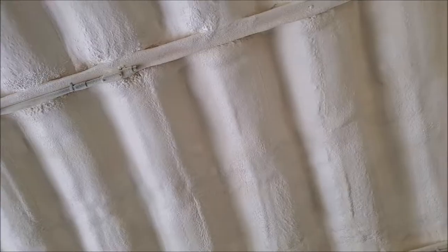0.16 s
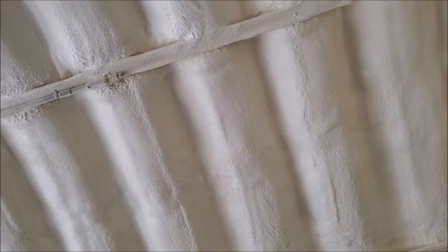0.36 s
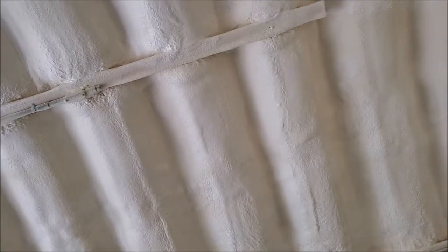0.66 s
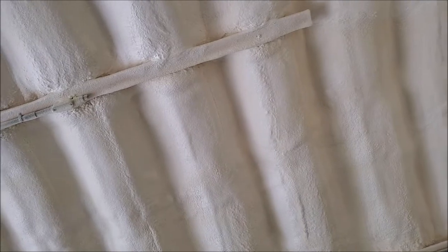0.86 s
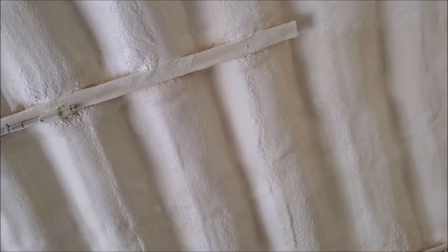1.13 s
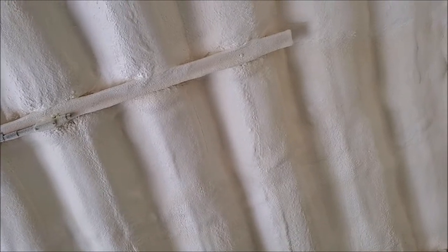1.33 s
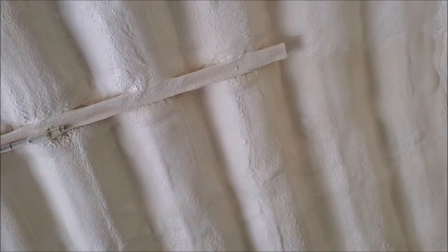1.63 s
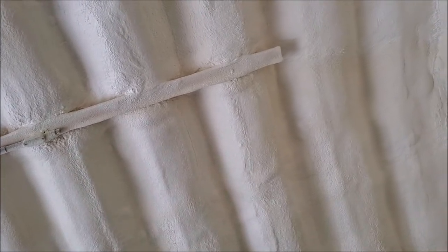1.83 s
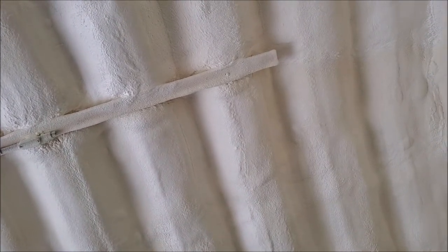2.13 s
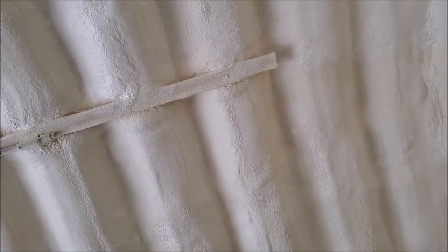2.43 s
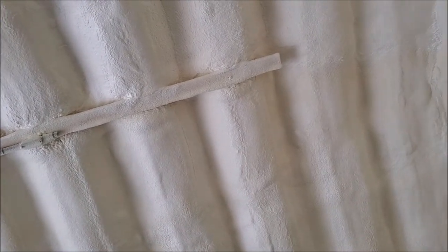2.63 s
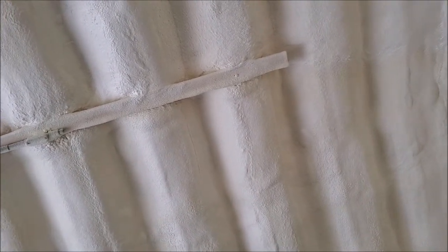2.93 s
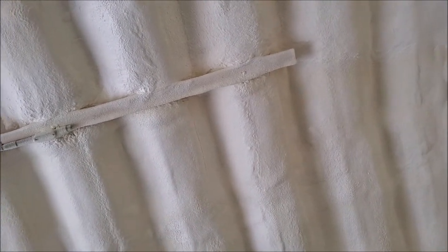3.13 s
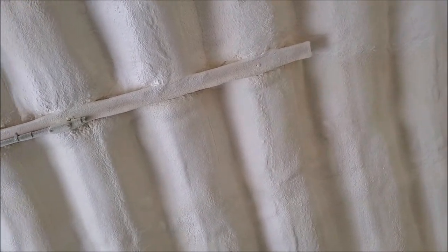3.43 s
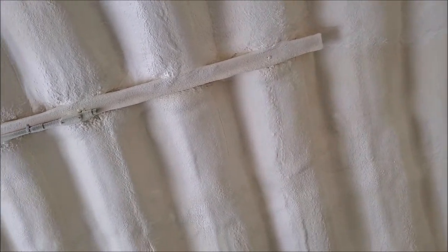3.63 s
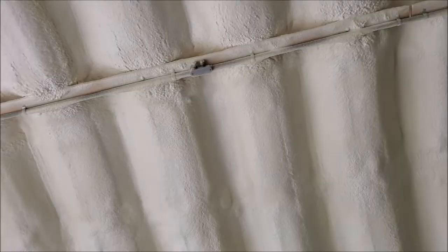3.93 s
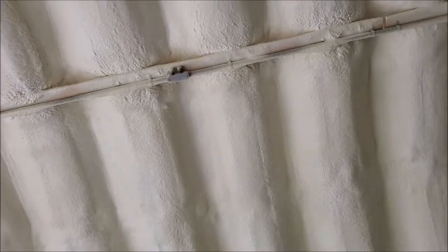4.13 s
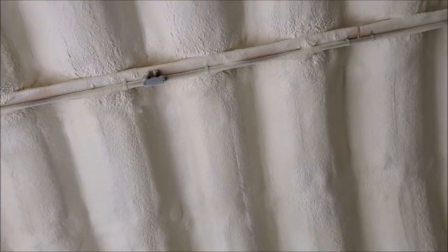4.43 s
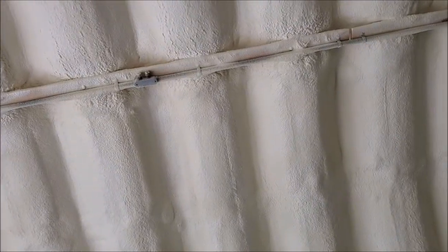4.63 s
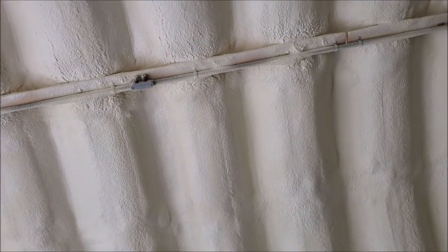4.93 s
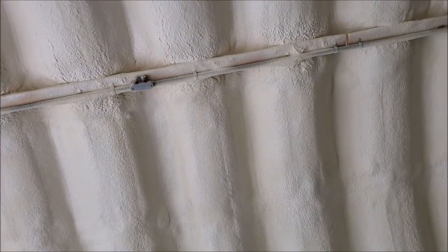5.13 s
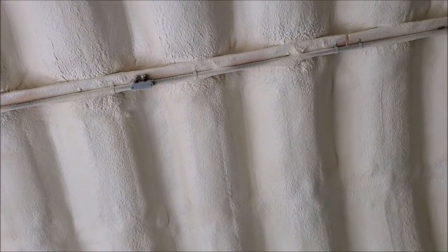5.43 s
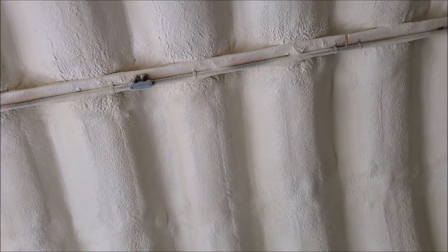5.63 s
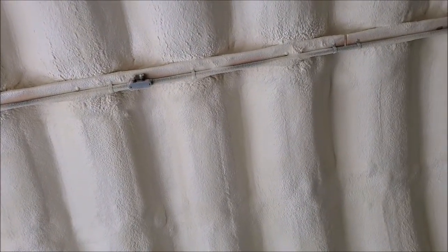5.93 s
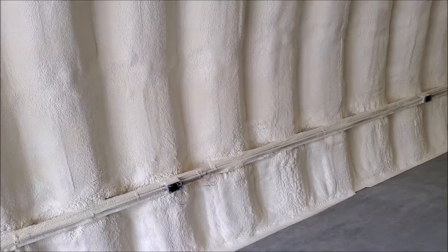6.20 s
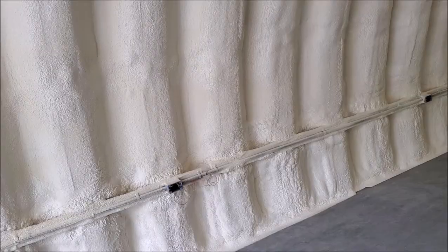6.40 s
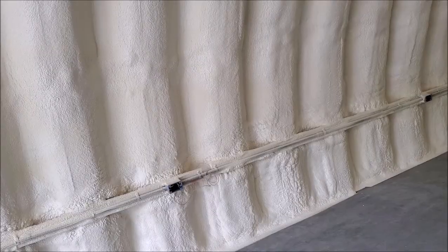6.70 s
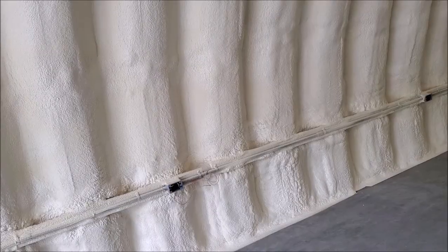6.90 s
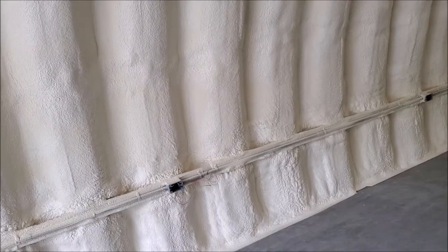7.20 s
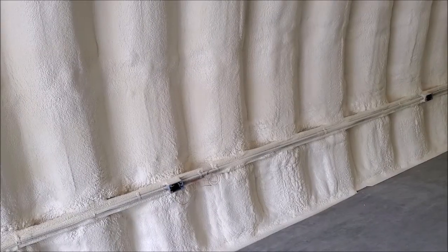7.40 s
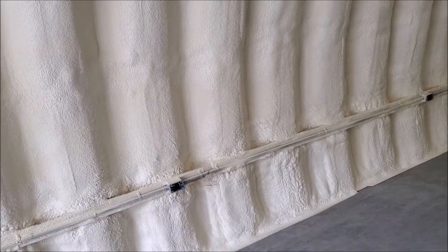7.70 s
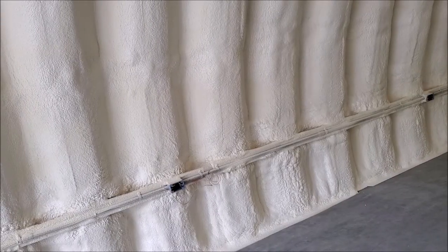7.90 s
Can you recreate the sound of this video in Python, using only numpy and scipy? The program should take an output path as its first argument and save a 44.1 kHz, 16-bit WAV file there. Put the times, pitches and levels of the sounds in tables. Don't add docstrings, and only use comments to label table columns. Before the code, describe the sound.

Inside a big bare metal shed, hardened foam breaks from a metal roof in six irregular pops. Two faint ones come first, then two strong cracks close together, a bright single crack after a pause, and a late softer one. Each blooms into a reverberant tail. Soft finger bumps touch the hand-held phone early on; faint insects, low rumble and hiss lie beneath.

```python
import sys
import numpy as np
from scipy import signal
from scipy.fft import rfft, irfft, next_fast_len
from scipy.io import wavfile
from scipy.ndimage import uniform_filter1d, map_coordinates

SR = 44100
rng = np.random.default_rng(int(sys.argv[2]) if len(sys.argv) > 2 else 0)


def to_wav(sig):
    pcm = np.clip(np.atleast_2d(sig), -1, 1) * 32767
    pcm = np.round(pcm).astype(np.int16)
    wavfile.write(sys.argv[1], SR, pcm.T)


def magnitude_from_level(level_db):
    exponent = np.asarray(level_db, float) / 20
    return 10 ** exponent


N = 355225

# [t/s, hall level/dB, brightness above 6 kHz/(dB/octave), depth of gap before walls answer, decay time factor]
POPS = [
    (0.8339, -36, -1, 0.53, 0.92),
    (1.7261, -37, -1, 0.41, 0.92),
    (1.9646, -23, 1, 0.092, 1.016),
    (2.554, -22.5, -3, 0.35, 1.097),
    (4.3506, -27, 3, 0.67, 1.013),
    (6.7964, -31, -2, 1.1, 0.96),
]


def unit(x):
    return x / np.sqrt(np.mean(x ** 2, axis=-1, keepdims=True) + 1e-20)


def along(points, hz):
    f, v = np.transpose(points)
    return np.interp(np.log(hz + 1), np.log(f + 1), v)


def curves(rows):
    s, *cols = np.transpose(rows)
    return [np.interp(np.arange(N) / SR, s, c) for c in cols]


def wobble(rate_hz, size=N):
    knots = rng.standard_normal(int(size * rate_hz / SR) + 4)
    return map_coordinates(knots, [np.arange(size) * rate_hz / SR])


def coloured(x, db_of):
    m = next_fast_len(x.shape[-1])
    gain = magnitude_from_level(db_of(np.fft.rfftfreq(m, 1 / SR)))
    return irfft(rfft(x, m) * gain, m)[..., :x.shape[-1]]


def causal(db_of, size=2048):
    cep = irfft(np.log(magnitude_from_level(db_of(np.fft.rfftfreq(size, 1 / SR))) + 1e-6), size)
    cep[..., 1:size // 2] *= 2
    cep[..., size // 2 + 1:] = 0
    return irfft(np.exp(rfft(cep)), size)


def add(out, s, x):
    k = round(s * SR)
    out[:, k:k + x.shape[1]] += x[:, :N - k]


def fractures():
    # [t/s, left peak/dB]
    snap_rows = [(.8339, -19), (.8351, -22), (.8592, -23), (1.7256, -19), (1.7263, -24), (1.9638, -15),
                 (1.9652, -9), (1.9661, -8), (1.9674, -11), (2.5541, -8), (2.5547, -7), (4.3506, -5),
                 (4.3514, -6), (4.3526, -7), (6.7967, -9), (6.7986, -14), (6.8165, -19)]
    # [right port re left/dB, floor bounce delay/s, bounce peak/dB]
    places = [(-9, .0058, -23), (-12, .0055, -26), (-6, .0063, -9), (-14, .0059, -10), (-13, .0077, -7),
              (-12, .0074, -11)]
    # [first t/s, gap/s, first level/dB, growth/(dB/tick)]
    run_ups = [
        (.8155, .0052, -58, 5),
        (1.9555, .0022, -40, 5),
    ]
    bounce_shade = .45
    ticks = 4

    def nearest(s):
        return np.argmin([abs(pop[0] - s) for pop in POPS])

    direct = [(nearest(s), s, db, db + places[nearest(s)][0]) for s, db in snap_rows]
    floor = [(k, POPS[k][0] + late_s, db, db + bounce_shade * shade_db)
             for k, (shade_db, late_s, db) in enumerate(places)]
    run_up = [(nearest(s), s + k * gap_s, db + k * grows_db, db + 3 + k * grows_db)
             for s, gap_s, db, grows_db in run_ups for k in range(ticks)]
    return direct + floor + run_up


def tear_db(k, hz):
    # [f/Hz, level/(dB/Hz)]
    panels = [
        [(260, -7), (350, -5.5), (470, -2), (1100, 1), (1400, -3.5), (1800, -2), (3000, -6.5)],
        [(95, -13), (250, -4), (400, -2.5), (600, -8), (1150, 1), (1650, 0), (3100, -9.5)],
        [(100, -5), (240, -3), (310, -4.5), (410, -1.5), (1100, -0.5), (1400, -2.5), (2400, -8), (3000, -14)],
        [(105, -14), (168, -11), (260, -6.5), (340, -4.5), (450, -1), (3000, -16.5)],
        [(165, -22), (440, -3), (700, -8), (890, -5), (1660, -2.5), (2900, -3.5), (5300, -8)],
        [(95, -16.5), (400, -5.5), (600, -3), (850, -4.5), (1690, -4.5), (2800, -1.5), (5200, -12)],
    ]
    panel_q = 4
    # [bass/dB, middle/dB, treble/dB]
    tearing = [(-23, -9, -6.5), (-20, -9.5, -6), (-15, -10, -13.5), (-26, -14, -15), (-22.5, -11.5, -1.5),
               (-26, -7, -2.5)]
    tearing_hz = (70, 900, 4513)
    # [f/Hz, gain/dB]
    left_port = [(25, -25.5), (60, 5), (100, -4), (400, 1.5), (3000, 2.5), (4000, 5), (6000, 4.5),
                 (7400, -16.5), (8300, -9), (9500, -9.5), (11500, -19), (14000, -28.5), (15600, -45.5)]
    # [f/Hz, gain/dB]
    right_port = [(60, 2), (300, -2), (1000, -1.5), (3000, 0.2), (3700, -8.5), (5400, -14.5), (7300, 1),
                  (9000, -15.5), (11500, -2)]
    ring = sum(magnitude_from_level(2 * db) / (1 + (2 * panel_q * np.log((hz + 1) / c)) ** 2) ** 2 for c, db in panels[k])
    broad = magnitude_from_level(2 * along(list(zip(tearing_hz, tearing[k])), hz))
    panel_db = 10 * np.log10(ring + broad)
    panel_db = panel_db - 10 * np.log10(np.mean(magnitude_from_level(2 * panel_db) * (hz < 6000)))
    bright_db = along([(6000, 0.0078), (12000, POPS[k][2])], hz)
    left = POPS[k][1] + panel_db + bright_db + along(left_port, hz)
    return np.array([left, left + along(right_port, hz)])


def snaps():
    # [f/Hz, gain/dB]
    facing = [(300, -9), (1100, 1), (1750, 10), (2150, -2), (2800, 5), (3700, 2), (5500, 11), (8600, 12),
              (12000, 4)]
    # [f/Hz, gain/dB]
    shaded = [(300, -6), (1100, 2), (1700, 9), (2150, -1), (2800, 2), (4000, 0), (12000, -4)]
    # [f/Hz, boost/dB]
    knocks = [(1750, 6), (1500, 3), (1500, 10), (450, 5), (1660, 3), (1700, 2)]
    knock_width = .3
    t60_s, right_delay_s, trim_db = .004, .00035, -.8
    out, t = np.zeros((2, N)), np.arange(128) / SR
    for pop, s, *peak_db in fractures():
        def path_db(hz):
            knock_hz, boost_db = knocks[pop]
            knock_db = boost_db * np.exp(-(np.log((hz + 1) / knock_hz) / knock_width) ** 2)
            return tear_db(pop, hz) + knock_db + [along(facing, hz), along(shaded, hz)]

        burst = rng.standard_normal(len(t)) * magnitude_from_level(-60 * t / t60_s)
        spectrum = rfft(burst)
        burst = irfft(spectrum / np.abs(spectrum) ** .8, len(t))
        crack = signal.fftconvolve(causal(path_db), burst[None], axes=1)
        crack[1] = np.roll(crack[1], round(right_delay_s * SR))
        crack = crack / np.abs(crack).max(axis=1, keepdims=True)
        add(out, s, crack * magnitude_from_level(np.c_[peak_db] + trim_db))
    return out


def hall():
    # [f/Hz, t60/s, build-up/s]
    hall_bands = [(60, 1.3, 0.041), (150, 1.4, 0.023), (355, 1.06, 0.0063), (720, 1.104, 0.0055),
                  (934, 0.86, 0.012), (1300, 0.62, 0.0011), (2472, 0.7, 0.003047), (4970, 0.69, 0.00065),
                  (7540, 0.55, 0.0033), (12920, 0.38, .003)]
    # [t after pop/s, level/dB]
    wall_echoes = [(0, -14), (.006, -7), (.012, -5.5), (.017, -1),
                   (.023, 5.5), (.032, -3.5), (.045, 2), (.06, 2.5), (.075, 1.5), (.09, 0)]
    # [f/Hz, correlation]
    hall_alike = [(60, .85), (130, .95), (290, .8), (640, .35), (1300, 0)]
    plateau_s, bend_s = .09, .04
    out, size = np.zeros((2, N)), 3 * SR // 2
    t, hz = np.arange(size) / SR, np.fft.rfftfreq(size, 1 / SR)
    turn = np.arccos(np.clip(along(hall_alike, hz), -1, 1)) / 2
    centres_hz = [row[0] for row in hall_bands]
    fading_s = np.logaddexp(0, (t - plateau_s) / bend_s) * 0.041 * (1 + 0.23 * t)
    walls_curve_db = np.interp(t, *np.transpose(wall_echoes))
    for pop, (s, _, _, gap, linger) in enumerate(POPS):
        a, b = rfft(rng.standard_normal((2, size))) * [np.cos(turn), np.sin(turn)]
        field = np.array([a + b, a - b]) * magnitude_from_level(tear_db(pop, hz))
        tail = np.zeros((2, size))
        for k, (band_hz, t60_s, rise_s) in enumerate(hall_bands):
            share = along(list(zip(centres_hz, np.eye(len(hall_bands))[k])), hz)
            build_up = 1 - np.exp(-t / max(rise_s, 1e-4))
            walls_db = gap * walls_curve_db * min(band_hz / 3000, 1)
            decay_db = -60 * fading_s / (linger * t60_s)
            tail += irfft(field * share, size) * build_up * magnitude_from_level(walls_db + decay_db)
        lumps_db = 1.4 * np.exp(-t / .1) * wobble(260, size)
        add(out, s, tail * magnitude_from_level(lumps_db - 2.5))
    return out


def handling():
    # [t/s, level/dB, f/Hz, t60/s, tick level/dB]
    bumps = [
        (0.1835, -39, 64, 0.12, -63),
        (0.344, -52.5, 61, 0.99, -90),
        (0.633, -47.5, 55, 0.24, -90),
        (6.116, -57.5, 109.8, 0.061, -65),
    ]
    out, t = np.zeros((2, N)), np.arange(SR) / SR
    for s, db, hz, t60_s, tick_db in bumps:
        onset = 1 - np.exp(-t / (0.088 * t60_s ** 2))
        thump = np.sin(2 * np.pi * hz * t) * magnitude_from_level(db - 60 * t / t60_s) * onset
        tick = uniform_filter1d(rng.standard_normal(len(t)), size=12) * magnitude_from_level(tick_db + 10 - 60 * t / 0.0088)
        add(out, s, (thump + tick) * magnitude_from_level([[-17], [0]]))
    return out


def insects():
    # [t/s, level/dB]
    chorus = [(0, -69.5), (.8, -67.5), (1.6, -68), (2.6, -68), (3.9, -69.5), (4.3, -71), (5.2, -71),
              (5.6, -72), (6.1, -70), (8.05, -69)]
    # [t/s, share]
    singer = [(0, .85), (1.5, .7), (3.5, .8), (4.2, .65), (5.5, .35), (6.3, .45), (8.05, .55)]
    # [f/Hz, level/(dB/Hz)]
    wing = [(4000, -58.5), (4600, -27), (5000, -10), (5500, -1), (6000, -15.5), (6700, -21), (7300, -35.5),
            (8000, -80)]
    level_db, share = curves(chorus)[0], np.clip(curves(singer)[0], 0, 1)
    stroke_hz = 73.2 + 1.0 * wobble(3.3)
    stroke = np.exp(0.79 * np.cos(2 * np.pi * np.cumsum(stroke_hz) / SR))
    near = unit(stroke * rng.standard_normal((2, N)))
    far = rng.standard_normal((2, N))
    song = coloured(share * near + np.sqrt(1 - share ** 2) * far, lambda hz: along(wing, hz))
    return unit(song) * magnitude_from_level(level_db + wobble(2.5) * 0.86 + [[6.3], [-10.5]])


def rumble():
    # [f/Hz, level/(dB/Hz)]
    rumble_colour = [(15, -25.5), (35, -13), (50, -2.5), (62, 3.5), (75, -5.5), (100, -6.5), (150, -17.5),
                     (300, -27.5), (600, -74)]
    # [t/s, rise/dB, half length/s]
    swells = [(0.254, 4, 0.096), (.8, 5, 0.46), (2.496, 5, 0.83), (3.996, 6, 0.18), (5.001, 4.5, 0.34),
              (5.9, 2.5, .3), (7.5, 1.5, 0.53)]
    t = np.arange(N) / SR
    level_db = -76.5 + sum(db * np.exp(-((t - s) / half_s) ** 2) for s, db, half_s in swells)
    a, b, common = unit(coloured(rng.standard_normal((3, N)), lambda hz: along(rumble_colour, hz)))
    both = np.array([a + .9 * common, b + 0.72 * common])
    return both * magnitude_from_level(level_db + 2.2 * wobble(8.2) + [[-6.5], [2.2]])


def still_air():
    # [f/Hz, level/(dB/Hz)]
    air_left = [(150, -9.5), (300, 1), (800, -10), (1100, -4), (1500, -2), (2100, -7), (2700, -6),
                (4300, -6.5), (7300, -12), (8600, 2), (10000, -9), (10800, -16.5), (13000, -15),
                (15500, -11)]
    # [f/Hz, level/(dB/Hz)]
    air_right = [(150, -2.5), (300, -2.5), (700, -8), (1100, -3), (1400, -7.5), (3000, -9), (4000, -12.5),
                 (6500, -4), (7500, -81), (9500, -25), (11500, -14.5), (13000, -14.5), (15500, -20.5)]
    hiss = coloured(rng.standard_normal((2, N)), lambda hz: np.array([along(air_left, hz), along(air_right, hz)]))
    return magnitude_from_level([[-75], [-76]]) * unit(hiss) * magnitude_from_level(0.94 * wobble(4.9))


def motors():
    # [f/Hz, loudest t/s, level/dB, fade-in/(dB/s), fade-out/(dB/s)]
    hum = [
        (241, 3.6, -94, 15, 1.5),
        (156, 4.1, -89, 18, 13),
    ]
    stops_s = 6.14
    t, tones = np.arange(N) / SR, np.zeros(N)
    for hz, s, db, rise, fall in hum:
        fade_db = np.maximum(rise * (s - t), fall * (t - s))
        level_db = db - fade_db + 8.0 + 3.027 * wobble(4)
        tones += magnitude_from_level(level_db) * np.sin(2 * np.pi * np.cumsum(hz + 1.5 * wobble(4.8)) / SR)
    return tones * np.clip((stops_s - t) * 20, 0, 1)


def scene():
    return snaps() + hall() + handling() + insects() + rumble() + still_air() + motors()


def low_pass(x):
    return signal.sosfilt(signal.butter(12, 16450, fs=SR, output="sos"), x)


def record(dry):
    return low_pass(dry)


dry = scene()
out = record(dry)
to_wav(out)
```